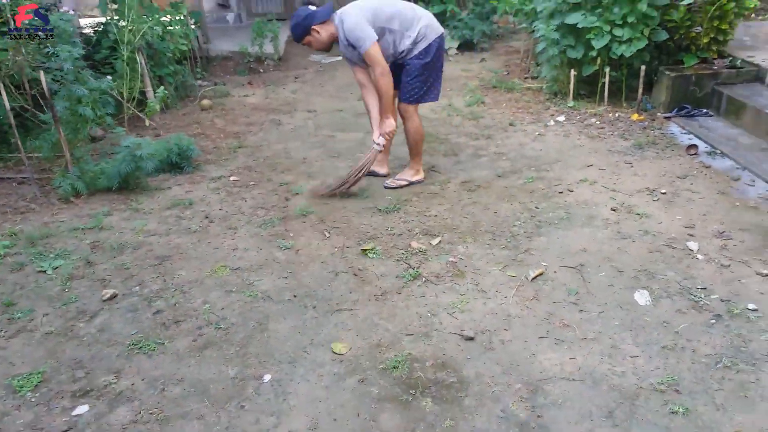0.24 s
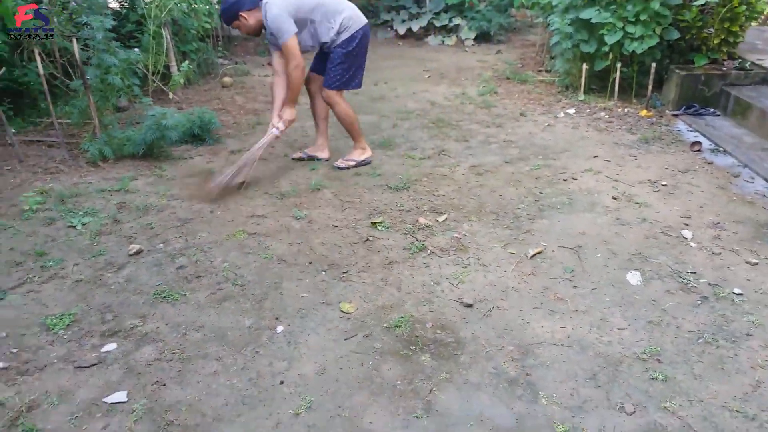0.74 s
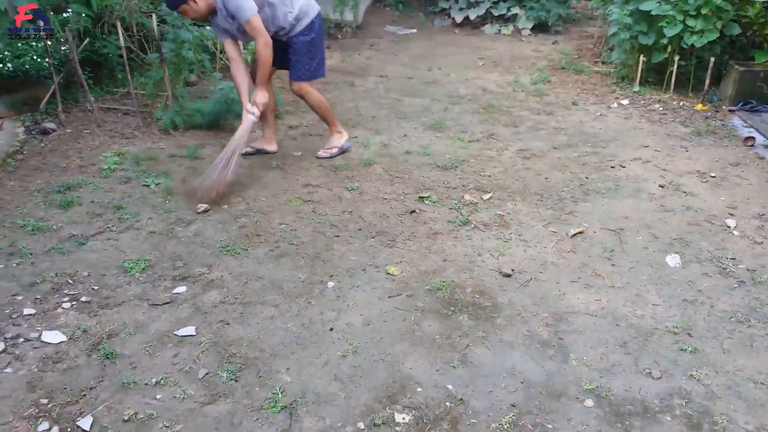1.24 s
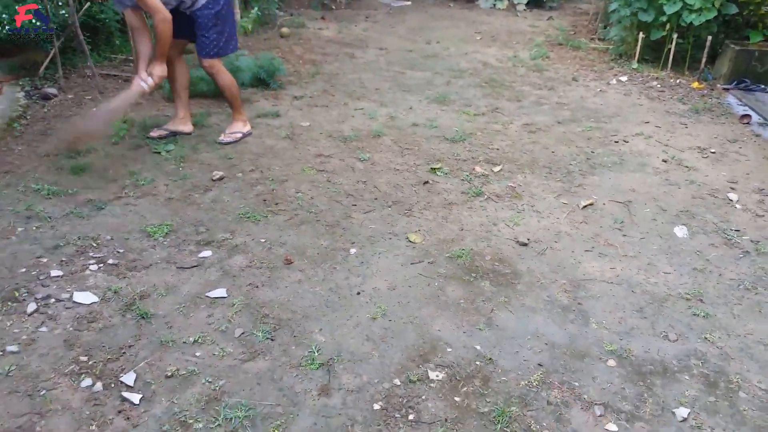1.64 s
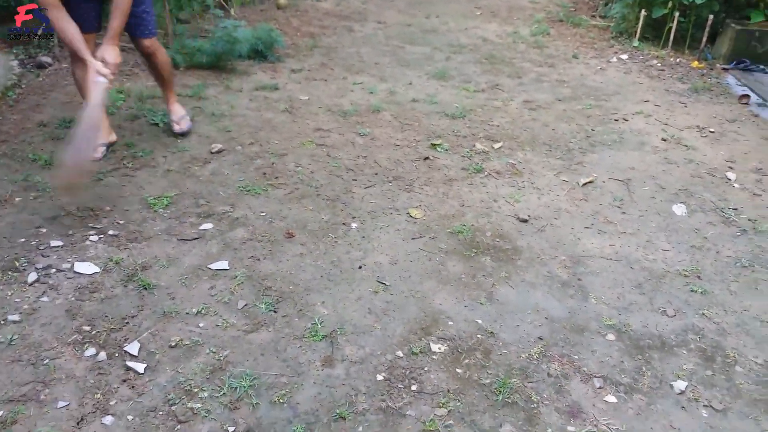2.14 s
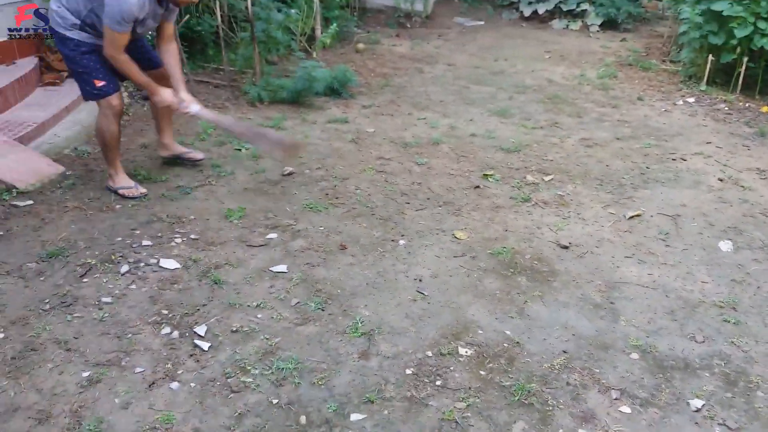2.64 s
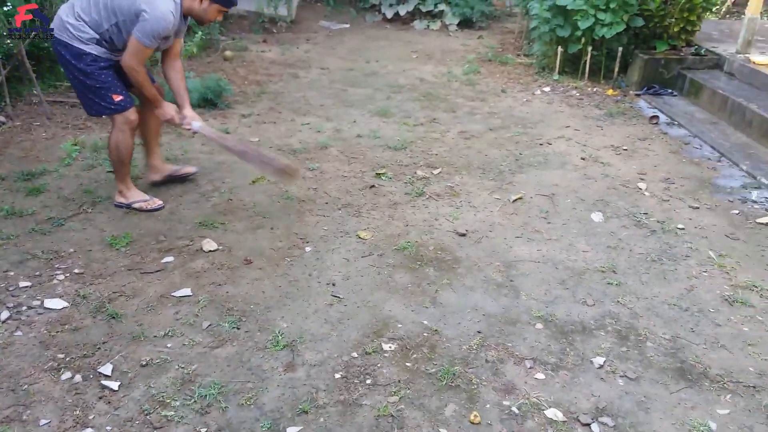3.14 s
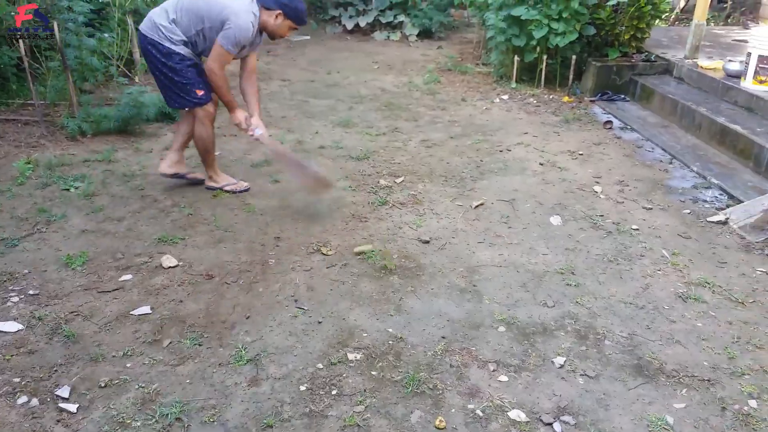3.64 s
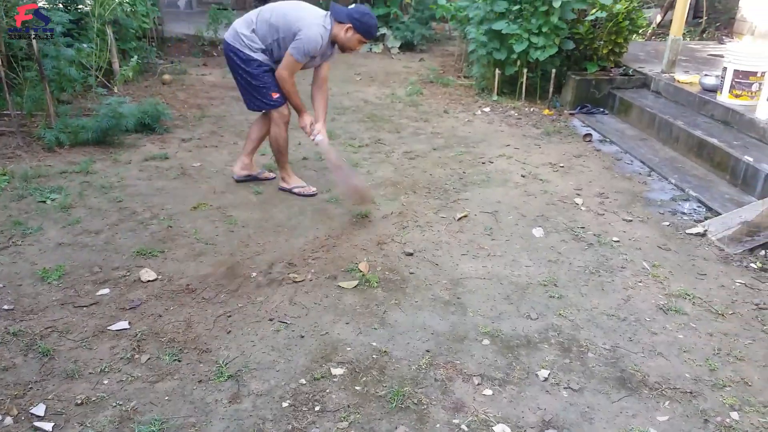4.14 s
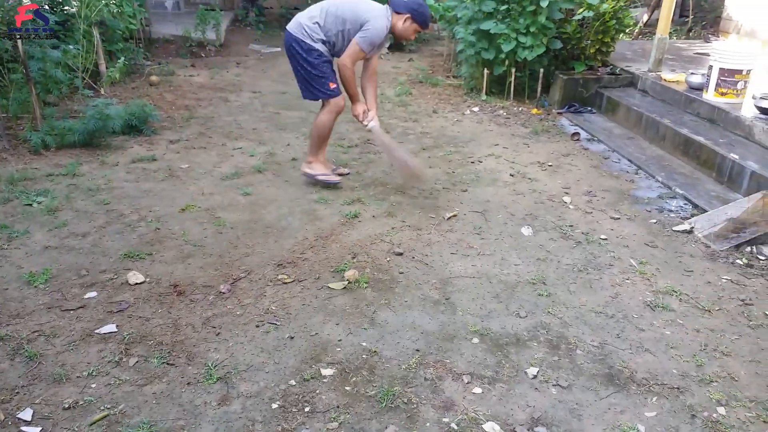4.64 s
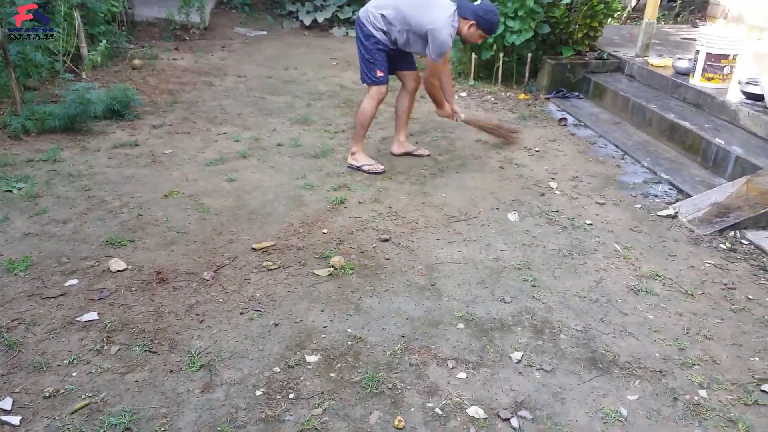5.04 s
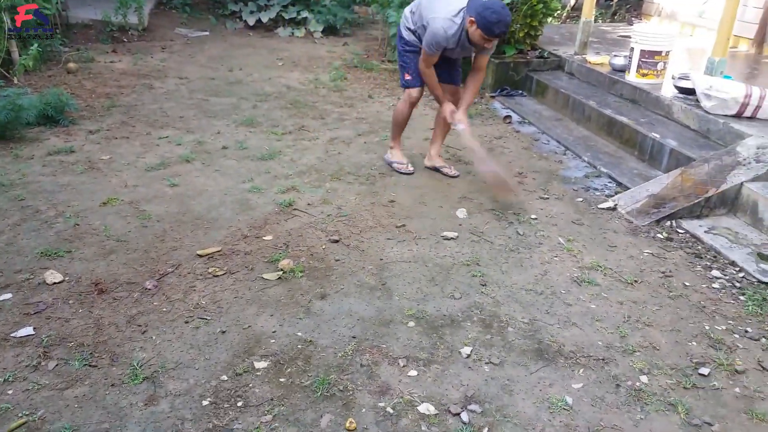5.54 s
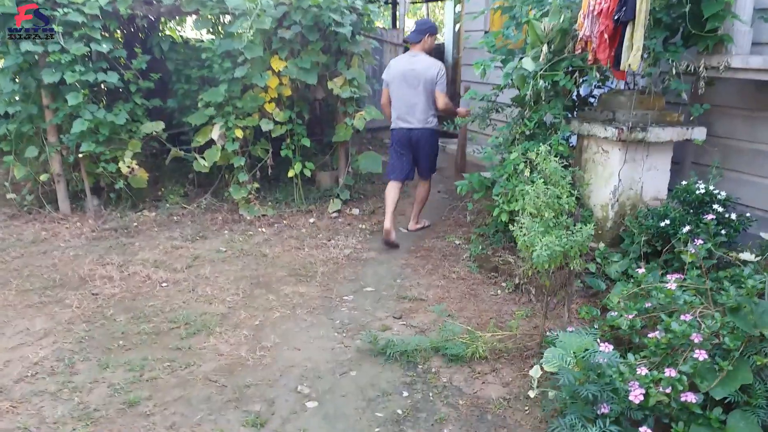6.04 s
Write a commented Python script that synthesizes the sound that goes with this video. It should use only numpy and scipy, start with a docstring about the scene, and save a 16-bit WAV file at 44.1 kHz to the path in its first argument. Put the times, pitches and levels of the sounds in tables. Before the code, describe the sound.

In a quiet garden a bundle of stiff twigs rapidly scrapes loose earth, each stroke a short, rasping burst with a fast fade. Strokes swell around one second, soften, then vary in bite. Sharp ticks, a tiny bird chirp and a dull hollow double knock pass by. After the last stroke only thin insect hiss, distant low rumble and a faint footfall remain. Bright detail flips between left and right while lows stay steady.

```python
"""Sweeping bare dirt with a stick broom

A hand broom of stiff sticks sweeps bare dirt in a garden, about six strokes a second: noise and random
grit impacts drive ringing sticks. Snaps and thuds are damped tones with noise; bird chirps and a hollow
double knock are short gliding tones; insects and hums are resonant noise; the outdoor air is shaped noise.
The bright sounds jump to the other ear and back about once a stroke."""
import sys
import numpy as np
from scipy import signal
from scipy.fft import rfft, irfft, next_fast_len
from scipy.io import wavfile
from scipy.ndimage import uniform_filter1d, minimum_filter1d

SR = 44100
rng = np.random.default_rng(int(sys.argv[2]) if len(sys.argv) > 2 else 0)


def materialize(psi):
    """Save the field psi as 16-bit PCM at rate SR to the path in sys.argv[1].

    A 1-D psi becomes a single channel; in a 2-D psi each row is a channel.
    """
    bounded = np.clip(np.atleast_2d(psi).T, -1, 1)
    quanta = np.round(bounded * 32767).astype(np.int16)
    wavfile.write(sys.argv[1], SR, quanta)


N = 276948

# Strokes of the broom. Each row: touch in seconds, time until the hand eases in seconds, length in seconds,
# relative level as the hand eases in dB, swell since the touch in dB.
STROKES = [(-0.001, 0.073, 0.11, -24.5, -8.5), (0.146, 0.069, 0.14, -20.0, -0.5),
           (0.316, 0.063, 0.096, -17.0, 1.5), (0.487, 0.023, 0.073, -17, 0.5), (0.625, 0.051, 0.1, -18, 1),
           (0.793, 0.034, 0.15, -13.5, 4), (0.963, 0.048, 0.095, -14, 3.5), (1.106, 0.041, 0.085, -11, 17),
           (1.275, 0.051, 0.14, -13.5, 4.5), (1.457, 0.047, 0.089, -12.5, 7.5),
           (1.65, 0.091, 0.1, -20.5, -5), (1.822, 0.055, 0.083, -17, -2), (1.99, 0.052, 0.089, -16, 1),
           (2.161, 0.067, 0.07, -18, -3.5), (2.3, 0.032, 0.059, -19, -2.5), (2.469, 0.06, 0.1, -14.5, 6),
           (2.641, 0.037, 0.068, -13.0, 2.5), (2.775, 0.056, 0.072, -12.5, 5.5),
           (2.95, 0.062, 0.1, -18.0, 7.0), (3.117, 0.05, 0.098, -17, 3), (3.304, 0.07, 0.086, -18.5, 4.5),
           (3.463, 0.058, 0.093, -18.5, 4.5), (3.635, 0.036, 0.1, -18.0, 2), (3.803, 0.052, 0.11, -16, 0.5),
           (3.976, 0.045, 0.066, -16.0, 3.5), (4.148, 0.049, 0.15, -19.5, -0.5),
           (4.318, 0.051, 0.094, -18.5, 5.5), (4.488, 0.041, 0.09, -19, 5.5),
           (4.658, 0.046, 0.092, -21.5, 1.5), (4.8, 0.038, 0.084, -13, 22.5),
           (4.985, 0.026, 0.091, -18.5, 11), (5.134, 0.051, 0.1, -18, 15), (5.307, 0.056, 0.1, -16, 13.5),
           (5.514, 0.027, 0.066, -15.5, -1.5), (5.687, 0.041, 0.11, -14, 19)]
REST_S = 5.86  # the sweeping ends


def from_db(db):
    """Decibels to gain."""
    return 10 ** (np.asarray(db) / 20)


def rms_one(x):
    """Scale to rms 1."""
    return x / np.sqrt(np.mean(x ** 2) + 1e-20)


def seconds():
    """Time of every sample."""
    return np.arange(N) / SR


def on_bins(points):
    """Read (Hz, value) points at every FFT bin, on a log-frequency axis."""
    hz, value = np.transpose(points)
    bins_hz = np.fft.rfftfreq(next_fast_len(N + 4096, True), 1 / SR)
    return np.interp(np.log(bins_hz + 1e-3), np.log(hz), value)


def shaped(x, gains):
    """Filter with one gain per FFT bin."""
    size = next_fast_len(N + 4096, True)
    spectrum = rfft(x, size) * gains
    return irfft(spectrum, size)[..., :N]


def resonance(x, hz, width_hz):
    """Two-pole resonance with gain 1 on top."""
    radius = np.exp(-np.pi * width_hz / SR)
    zeros = np.array([1, 0, -1]) * (1 - radius ** 2) / 2
    poles = [1, -2 * radius * np.cos(2 * np.pi * hz / SR), radius ** 2]
    return signal.lfilter(zeros, poles, x)


def butter(x, hz, kind, order=2):
    """Butterworth filter."""
    return signal.sosfilt(signal.butter(order, hz, kind, fs=SR, output="sos"), x)


def drift(rate_hz):
    """Smooth random wander of rms 1."""
    step = max(1, int(SR / rate_hz / 2))
    count = N // step + 2
    return rms_one(np.interp(np.arange(N) / step, np.arange(count), rng.standard_normal(count)))


def add(out, s, sound):
    """Mix a short sound in at time s."""
    at = max(0, round(s * SR))
    out[..., at:at + sound.shape[-1]] += sound[..., :N - at]


def ground_at(s):
    """Patch of ground under the broom: body, top edge and dragging level in dB at time s."""
    # Each row: time in seconds, body of the scrape in dB, its top edge in dB,
    # relative level of tips dragging between strokes in dB.
    ground = [(0, .5, 2.7, -34), (1.2, 0.2, 0.5, -40), (2.3, -3, -1, -43.5), (3.1, -1.5, 2, -39.5),
              (3.8, -2.5, 1, -41), (4.3, 1.5, 3, -40.5), (5.1, 1, 4, -42), (5.75, -1, 5.5, -47)]
    times, *columns = np.transpose(ground)
    return [np.interp(s, times, column) for column in columns]


def pressure_db():
    """Each stroke bites, is pressed along, sags and lifts; a few tips drag on until the next one."""
    touch_s, lift_s = 0.0072, 0.0093  # landing and leaving times of the tips
    sag_db_per_s = 211.5  # once the hand eases
    lift_drop_db = 18  # just after the lift, below the level as the hand eased
    rest_db = -73
    corners = []
    for touch, press, length, db, swell_db in STROKES:
        drag_db = ground_at(touch)[2]
        sagged_db = db - sag_db_per_s * (length - press)
        corners += [(touch - touch_s, drag_db),
                    (touch, db - swell_db),
                    (touch + press, db),
                    (touch + length, sagged_db),
                    (touch + length + lift_s, db - lift_drop_db)]
    s, db = np.transpose(corners + [(REST_S, rest_db)])
    return np.interp(seconds(), np.maximum.accumulate(s), db)


def grit(per_s, size_db):
    """Tips hit grains of dirt at random moments: mostly tiny impacts, a few large."""
    spread = np.minimum(rng.exponential(1, (2, N)), 3)
    sizes = from_db(size_db * spread) * rng.choice([-1, 1], (2, N))
    chance = np.clip(per_s / SR, 1e-4, 1)
    hits = rng.random((2, N)) < chance
    return rms_one(sizes * hits / np.sqrt(chance))


def ringing_sticks(force, width_hz, count=18):
    """In every stroke other sticks carry the load, each ringing at a pitch of its own."""
    out = np.zeros((2, N))
    edges = [max(0, round(row[0] * SR)) for row in STROKES] + [N]
    pitches_hz = 1200 * 7.5 ** rng.random((len(STROKES), count))  # 1200 to 9000 Hz
    for start, end, stick_hz in zip(edges, edges[1:], pitches_hz):
        for k, hz in enumerate(stick_hz):
            out[:, start:end] += (-1) ** k * resonance(force[:, start:end], hz, width_hz)
    return out


def broom(impacts_per_s=7000, ring_share=0.44, judder_db=1.55, patchy_db=1.2, both_ears_share=0.13,
          level_db=-3.5):
    """Friction and grit drive the sticks; more pressure brings more tips down and more impacts."""
    # Colour of the scrape. Each row: frequency in Hz, relative level in dB per Hz.
    scrape_colour = [(100, -31.5), (600, -27), (1000, -20), (1350, -18), (1700, -13), (2600, -10),
                     (3100, -9.5), (3900, -3), (4480, 0), (5200, -7), (6300, -18.5), (7400, -16.5),
                     (9200, -34), (16000, -50)]
    pressure = pressure_db()
    impacts = grit(impacts_per_s * from_db(.8 * (pressure + 20)), size_db=4.5)
    friction = rng.standard_normal((2, N))
    force = friction + impacts
    force = force + ring_share * ringing_sticks(force, width_hz=63)
    force = force + both_ears_share * force[::-1]  # part of every scratch reaches both ears
    scrape = rms_one(shaped(force, from_db(on_bins(scrape_colour))))
    # the patch of ground tilts the colour
    body = shaped(scrape, on_bins([(2700, 1), (3600, 0)]))
    edge = shaped(scrape, on_bins([(5200, 0), (7500, .5), (10500, 1.3)]))
    body_gain, edge_gain, _ = from_db(ground_at(seconds()))
    body_gain = body_gain * from_db(patchy_db * drift(24))
    scrape = scrape + (body_gain - 1) * body + (edge_gain - 1) * edge
    # tips catch and slip in groups, so the level judders
    return scrape * from_db(level_db + pressure + judder_db * drift(130))


def drone(hz, width_hz, size):
    """A rough drone near one pitch: noise through two equal resonances."""
    once = resonance(rng.standard_normal((2, size)), hz, width_hz)
    return rms_one(resonance(once, hz, width_hz))


def garden():
    """Insect chorus in the hedges, with a few passing buzzes and hums: narrow bands of noise."""
    # Levels are ahead of the ear swap, widths are of each resonance.
    # Each row: pitch in Hz, width in Hz, level in dB rms, change after the sweeping ends in dB.
    insects = [(3900, 1200, -54.5, -1.5), (8100, 250, -57.5, -5.5), (9400, 930, -72.5, 3)]
    # Each row: start in seconds, length in seconds, pitch in Hz, width in Hz, level in dB rms before fades.
    buzzes = [(0, 1.46, 393, 37, -57), (0.415, .14, 9700, 400, -60), (0.418, .08, 1870, 370, -45.5),
              (0.912, 0.18, 9650, 400, -54), (1.712, 0.17, 9600, 400, -62), (5.899, 0.54, 82, 14, -55),
              (6.065, 0.22, 4200, 1100, -51.5)]
    out = np.zeros((2, N))
    after = seconds() > REST_S
    for hz, width_hz, db, change_db in insects:
        out += from_db(db + change_db * after) * drone(hz, width_hz, N)
    for s, length, hz, width_hz, db in buzzes:
        size = int(length * SR)
        add(out, s, from_db(db) * signal.windows.tukey(size, .5) * drone(hz, width_hz, size))
    return out


def air(level_db=-50, waver_db=1.5):
    """Outdoor air and distant traffic: noise whose shared part wavers, under steady noise of each ear."""
    # Each row: frequency in Hz, relative level in dB per Hz.
    air_colour = [(20, -17), (45, -7.5), (75, -0.5), (110, 1.5), (160, -1.5), (350, -3.5), (600, -9.5),
                  (1500, -13.5), (3000, -15), (6000, -25.5), (10000, -29), (16000, -31.5)]
    # Left-right likeness. Each row: frequency in Hz, share from 0 to 1.
    likeness = [(60, 0.98), (290, 0.7), (640, 0.39), (1400, 0), (3100, 0.12)]
    colour = from_db(on_bins(air_colour))
    alike = np.clip(on_bins(likeness), 0, 1)
    shared = shaped(rng.standard_normal(N), colour * np.sqrt(alike))
    own = shaped(rng.standard_normal((2, N)), colour * np.sqrt(1 - alike))
    wavering = shared * from_db(waver_db * drift(8))
    return from_db(level_db) * rms_one(wavering + own)


def snaps(soft_hz=4800, t60_s=0.0095, attack_s=.0004):
    """A stick springs free or a stone is hit: a dull dry crack and a quickly dying ring."""
    # Each row: start in seconds, level in dB before attack and ear swap, pitch in Hz,
    # dry crack relative to the ring in dB.
    snap_events = [(1.042, -25, 4520, -23), (1.054, -4, 4350, -34), (3.3635, 2, 4500, -17),
                   (3.9055, -7, 2670, -21), (4.23, -11.5, 2800, -3.5), (4.402, -12.5, 2700, -23),
                   (4.577, -10.5, 3600, -16), (4.601, -18, 4120, 1.5), (4.736, -17.5, 2760, -7),
                   (5.049, -19.5, 3800, 1), (5.373, -15, 4500, -10)]
    out, t = np.zeros(N), np.arange(SR // 20) / SR
    decay = from_db(-60 * t / t60_s) * (1 - np.exp(-t / attack_s)) ** 2
    for s, db, hz, crack_db in snap_events:
        noise = butter(rng.standard_normal(len(t)), 760, "high")
        crack = rms_one(butter(noise, soft_hz, "low", order=4))
        ring = np.sin(2 * np.pi * hz * t)
        add(out, s, from_db(db) * decay * (ring + from_db(crack_db) * crack))
    return out


def short_tones(events, flutter, overtone):
    """Short tones: bird chirps and hollow knocks, each fluttering and gliding, with a weak octave."""
    out = np.zeros(N)
    for s, length, start_hz, end_hz, db in events:
        hz = np.geomspace(start_hz, end_hz, int(length * SR))
        phase = 2 * np.pi * np.cumsum(hz) / SR
        tone = np.sin(phase) + overtone * np.sin(2 * phase)
        add(out, s, from_db(db) * signal.windows.tukey(len(hz), .5) * tone)
    return out * (1 + flutter * drift(300))


def thuds(puff_db=-9, t60_cycles=10.7, attack_s=0.0039):
    """Footfalls and soft bumps: one low damped tone with a puff of dull noise."""
    # Each row: start in seconds, level in dB before attack, pitch in Hz.
    thud_events = [(1.253, -38, 94), (1.564, -24, 178), (1.801, -36, 113), (2.416, -36, 183),
                   (4.011, -34, 67), (4.074, -37, 70), (4.949, -41, 112), (6.028, -37.5, 86)]
    out, t = np.zeros(N), np.arange(SR // 4) / SR
    for s, db, hz in thud_events:
        t60_s = t60_cycles / hz
        puff = rms_one(butter(rng.standard_normal(len(t)), [hz / 2, hz * 3.1], "band"))
        decay = from_db(-60 * t / t60_s) * (1 - np.exp(-t / attack_s))
        tone = np.sin(2 * np.pi * hz * t)
        add(out, s, from_db(db) * decay * (tone + from_db(puff_db) * puff))
    return out


def jump_sides(x, left_db=0.5, right_db=1.0):
    """One ear at a time gets the bright sound, the other a dull version; the change is abrupt."""
    # Filter for the dull ear. Each row: frequency in Hz, gain in dB.
    dull_side = [(600, -1.5), (1000, -2.5), (1700, -9.5), (3000, -15), (4450, -29.5), (5400, -24),
                 (6300, -15), (7400, -18.5), (9200, -10), (15000, 2)]
    cycle_s, first_left_s, left_share = .161026, .0976, .507
    last_left_s = 5.75  # left from here on
    tick_s, first_tick_s = .034193, .00385
    t = seconds()
    # the cycle is read at the middle of each tick, so swaps fall on a steady beat
    tick_middle = t - (t - first_tick_s) % tick_s + tick_s / 2
    in_left_part = ((tick_middle - first_left_s) / cycle_s) % 1 < left_share
    left = in_left_part | (t > last_left_s)
    dull = shaped(x, from_db(on_bins(dull_side)))
    bright = uniform_filter1d(np.array([left, ~left], float), size=13)
    return bright * x * from_db([[left_db], [right_db]]) + (1 - bright) * dull


def scene():
    """The sweeping in the quiet garden, its bright sounds jumping from ear to ear over the low ones."""
    # Falling bird chirps, then a hollow double knock; levels before flutter, fades and ear swap.
    # Each row: start in seconds, length in seconds, start pitch in Hz, end pitch in Hz, level in dB.
    bird_chirps = [(1.066, 0.043, 3780, 2770, -33.5), (5.58, 0.032, 7360, 6640, -41)]
    hollow_knocks = [(1.546, 0.026, 296, 320, -30.5), (1.6, 0.049, 330, 312, -36)]
    bright = broom() + garden() + snaps() + short_tones(bird_chirps, flutter=0.76, overtone=.02)
    low = air() + thuds() + short_tones(hollow_knocks, flutter=.5, overtone=0.086)
    return jump_sides(bright) + low


def record(dry, ceiling_db=-2.5, cutoff_hz=15850):
    """A fast limiter holds the highest peaks down and the top is cut steeply."""
    peak = np.abs(dry).max(axis=0)
    allowed = 1 / np.maximum(peak / from_db(ceiling_db), 1)
    gain = uniform_filter1d(minimum_filter1d(allowed, size=177), size=177)  # 4 ms
    steep = signal.ellip(10, .1, 80, cutoff_hz, fs=SR, output="sos")
    return signal.sosfilt(steep, dry * gain)


dry = scene()
out = record(dry)
materialize(out)
```